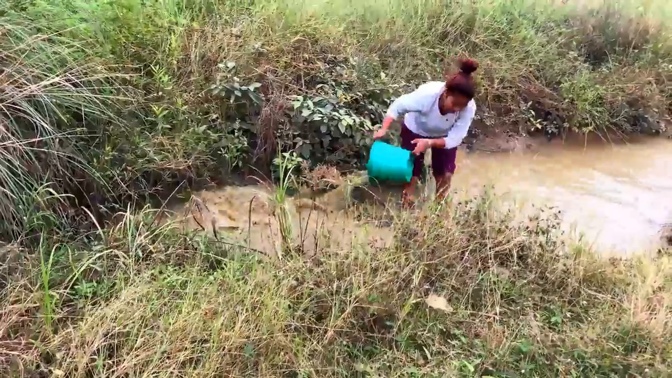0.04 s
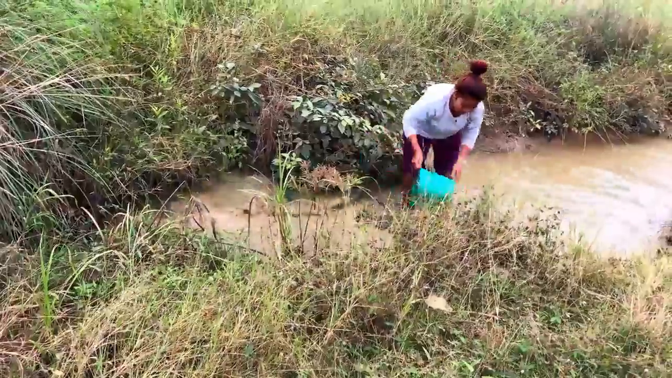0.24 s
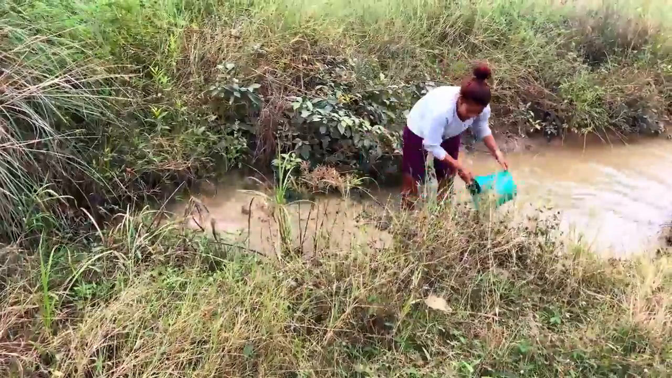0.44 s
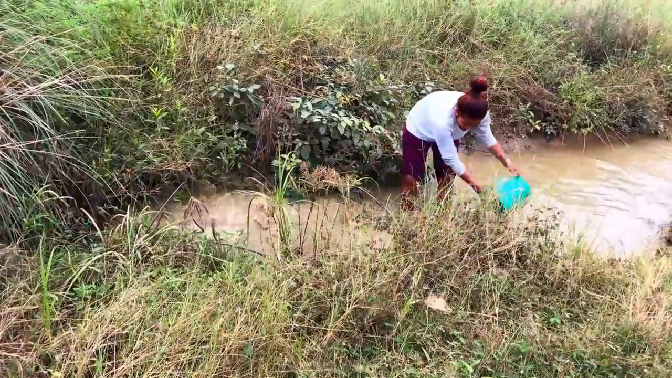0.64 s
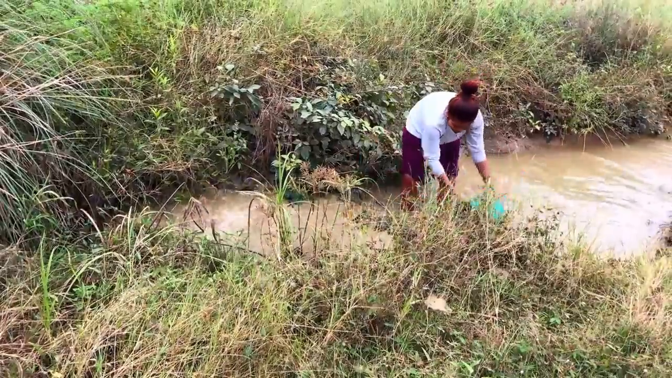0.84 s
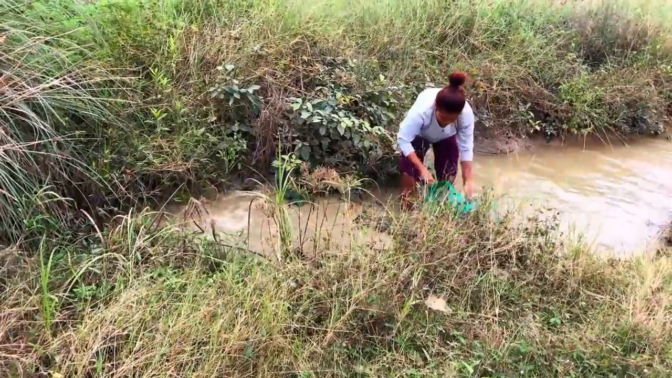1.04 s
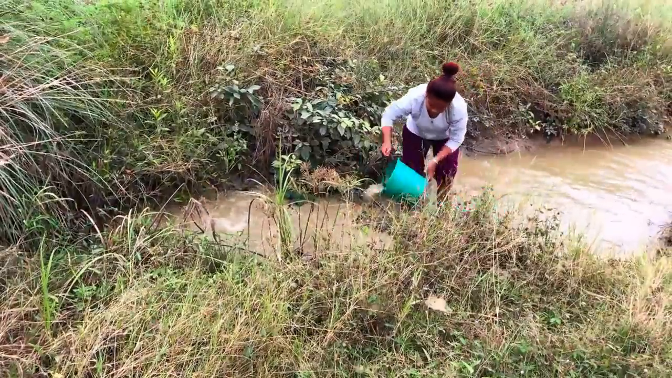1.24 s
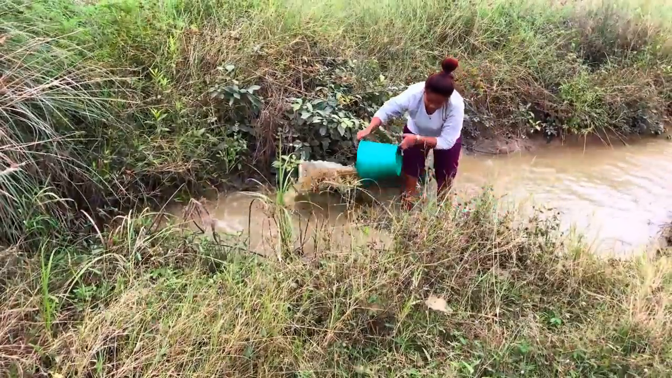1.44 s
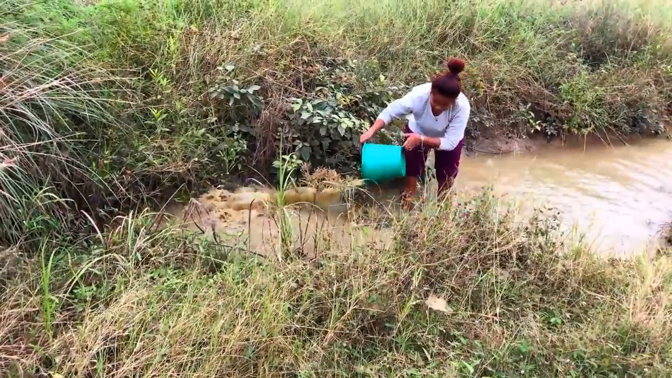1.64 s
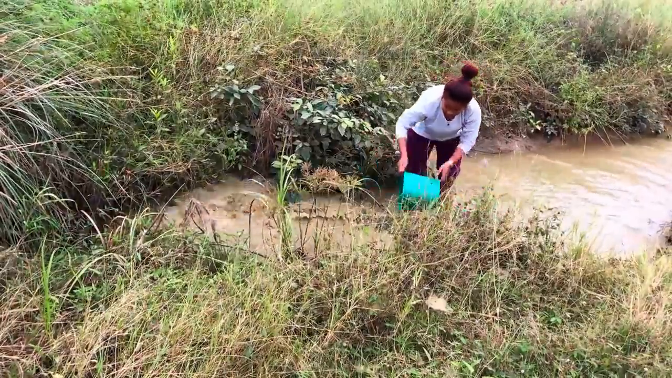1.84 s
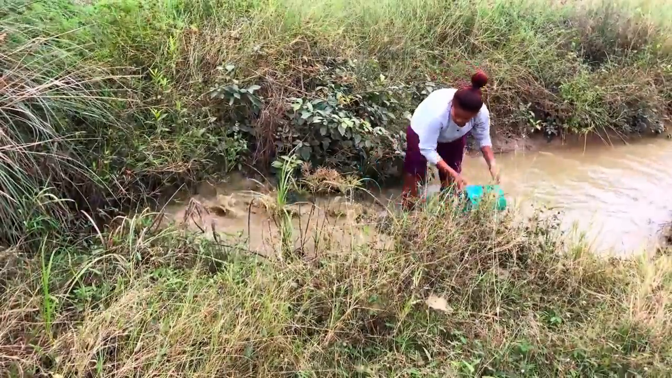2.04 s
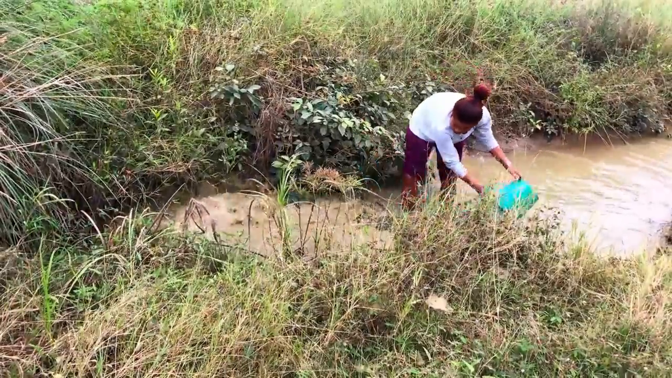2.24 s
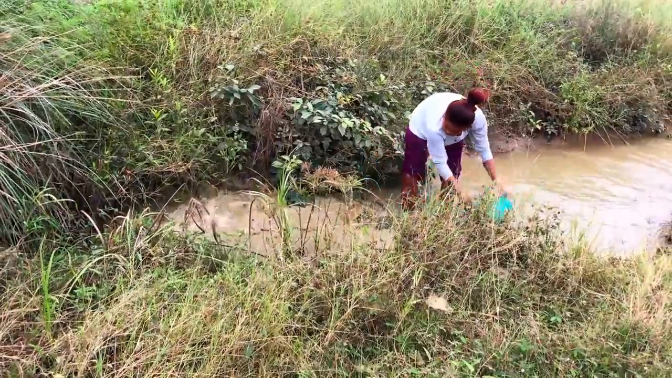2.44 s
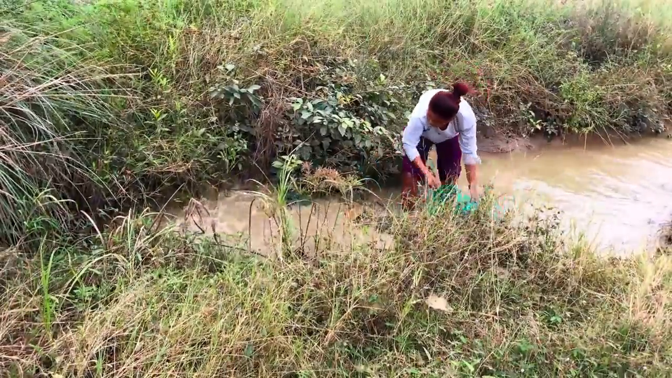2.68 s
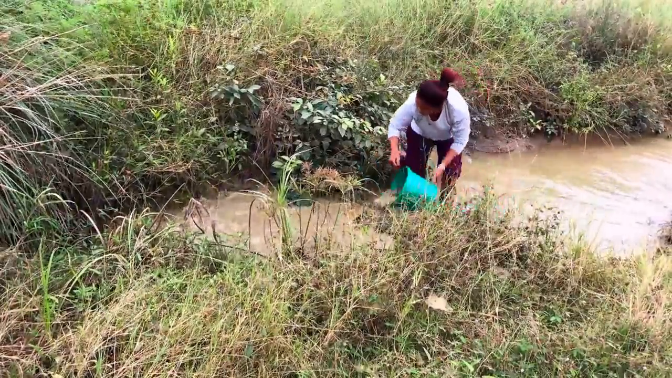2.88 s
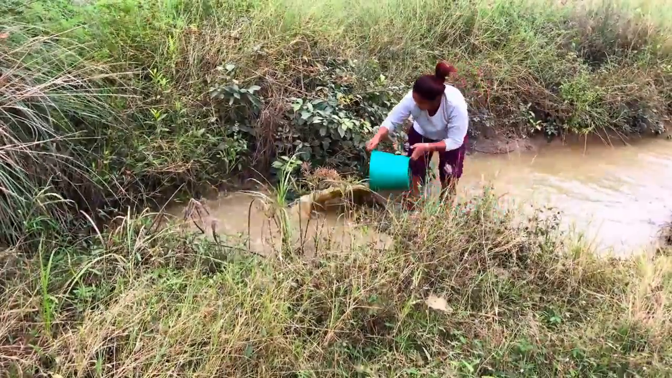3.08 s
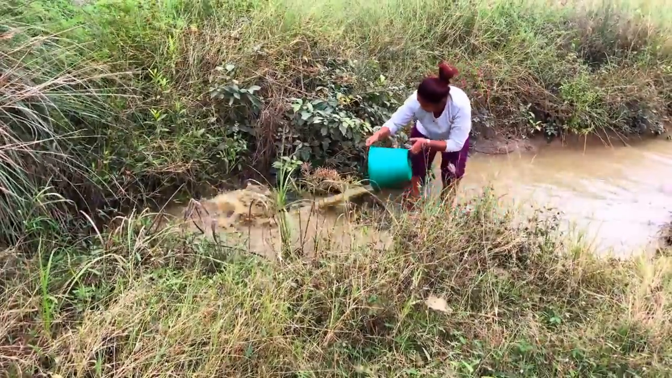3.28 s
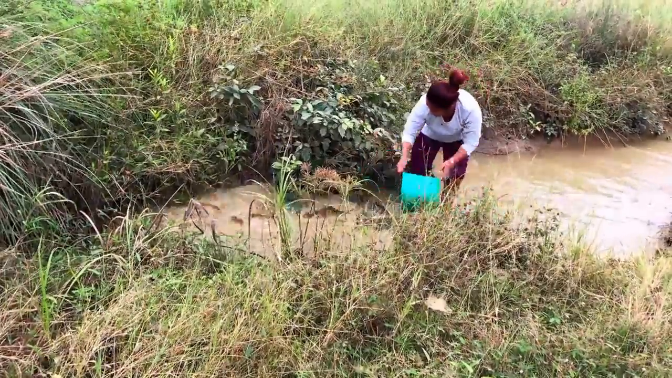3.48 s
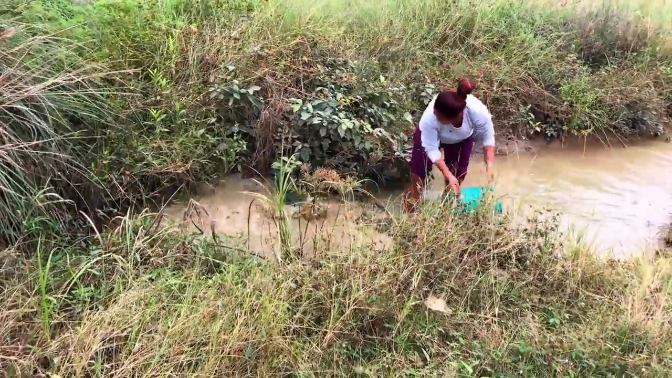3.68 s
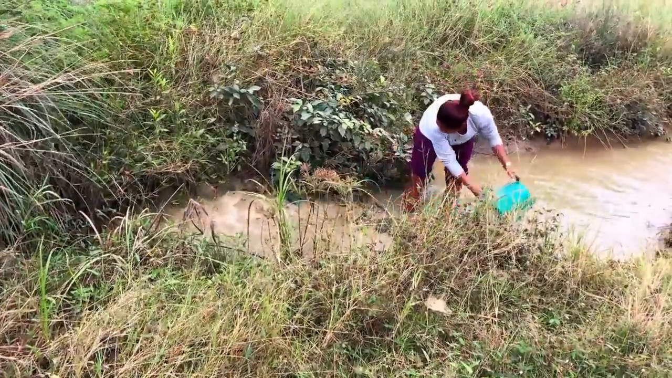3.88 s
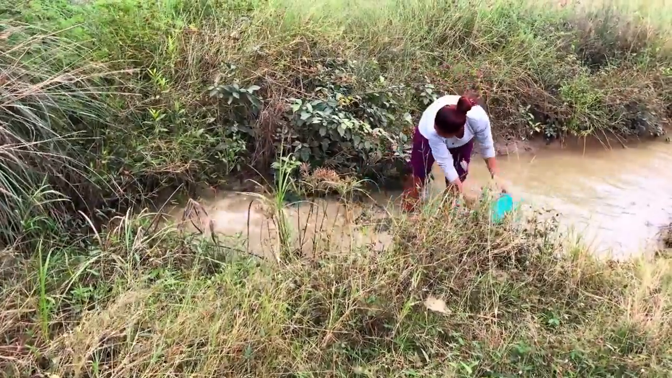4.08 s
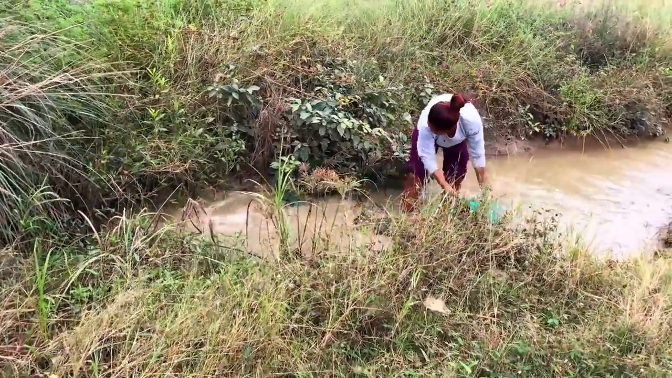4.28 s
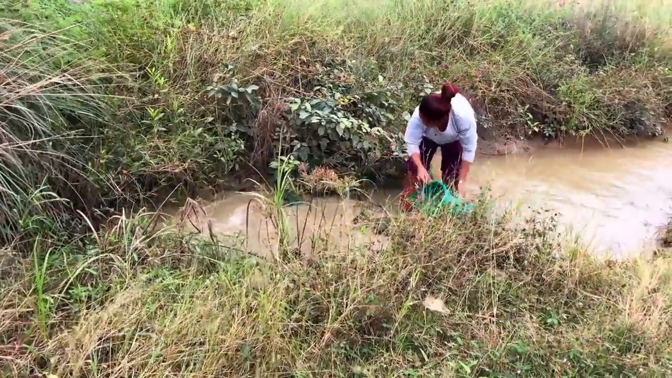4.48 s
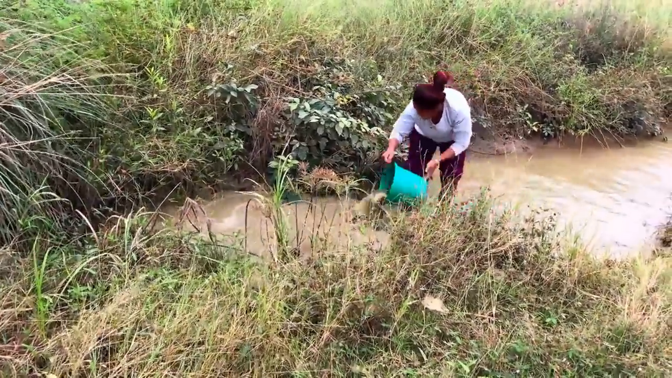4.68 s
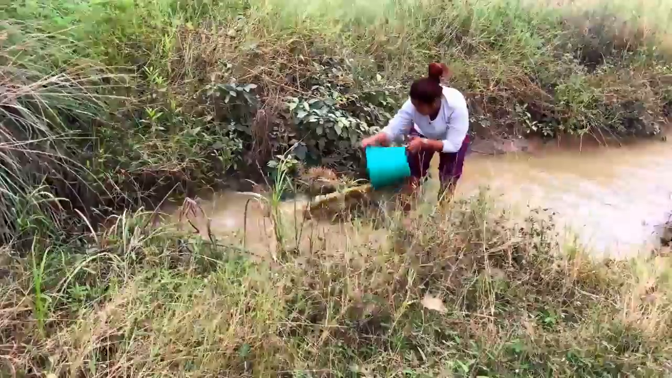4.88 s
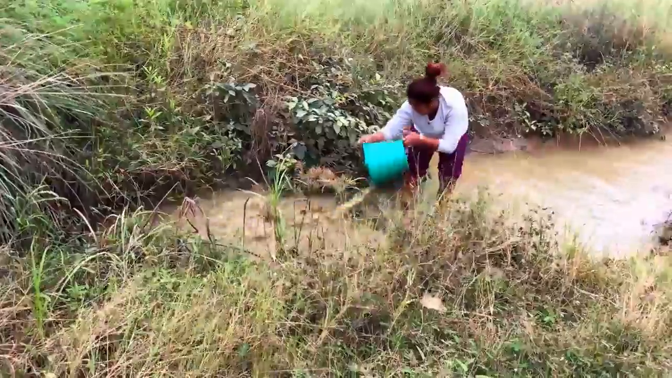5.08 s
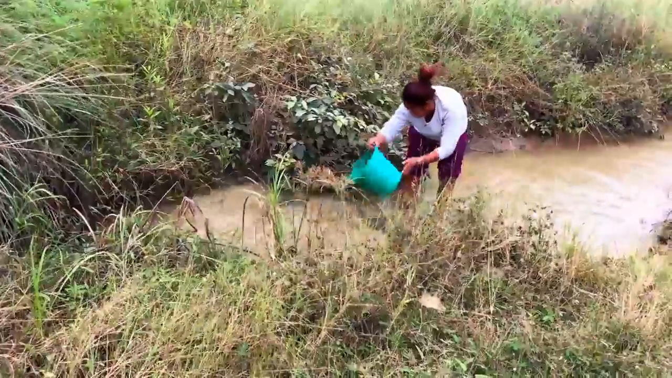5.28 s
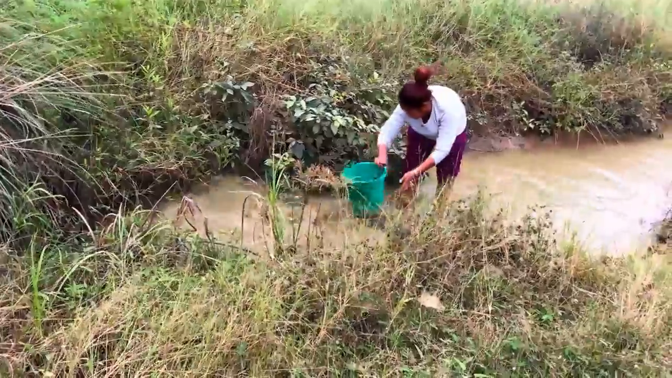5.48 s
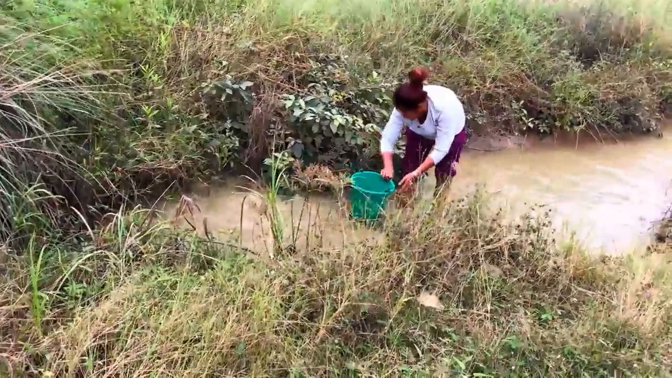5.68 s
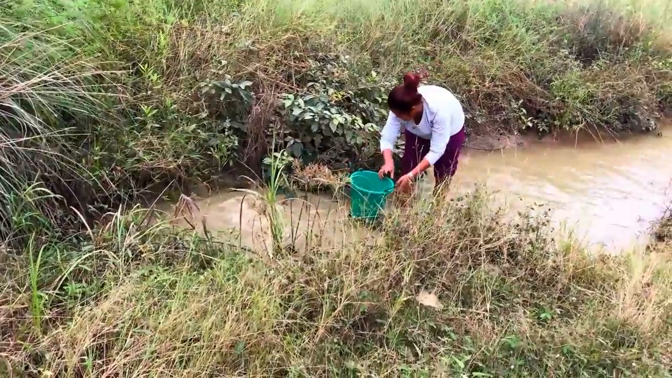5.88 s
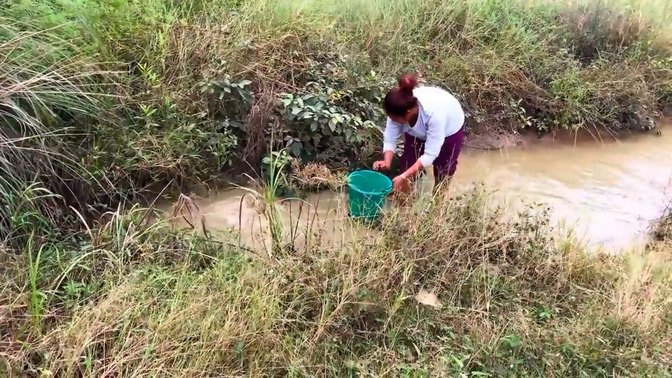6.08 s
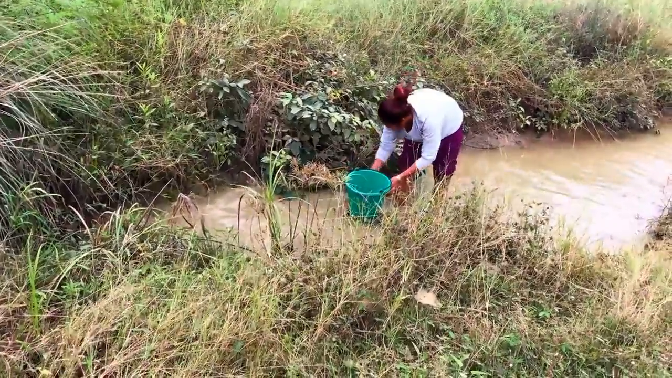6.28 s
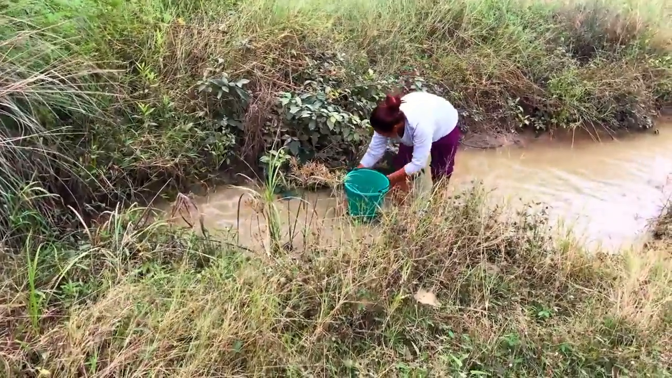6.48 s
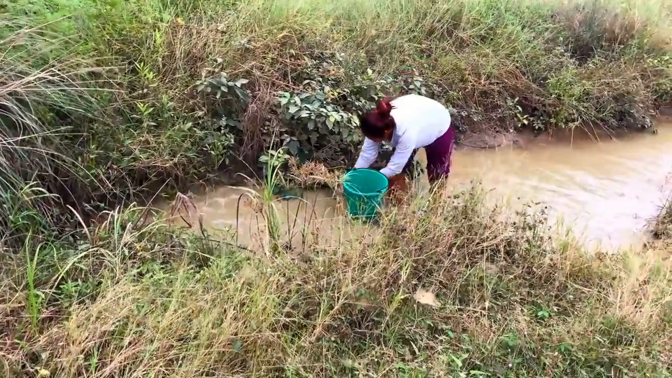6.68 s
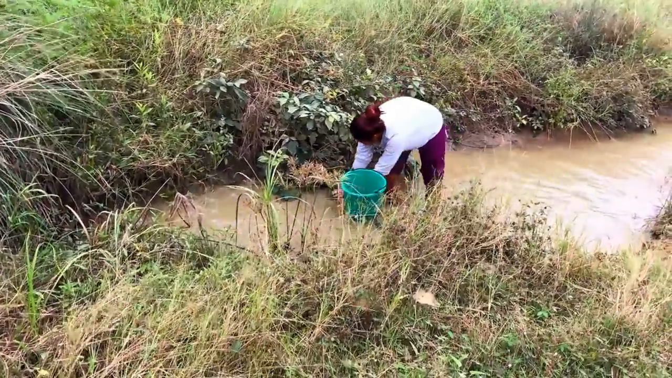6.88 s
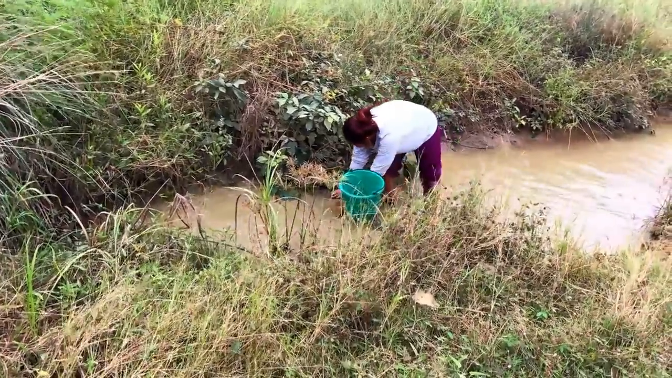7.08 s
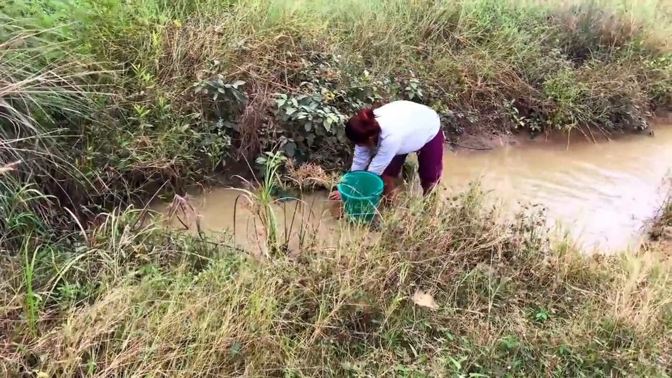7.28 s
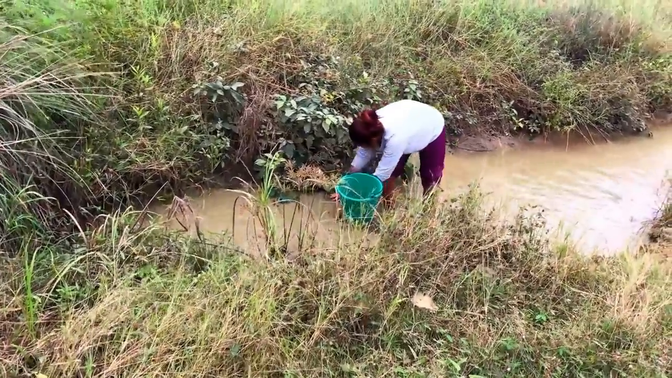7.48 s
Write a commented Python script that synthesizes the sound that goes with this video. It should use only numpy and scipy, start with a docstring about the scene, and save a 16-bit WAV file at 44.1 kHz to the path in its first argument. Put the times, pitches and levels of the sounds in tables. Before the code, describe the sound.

A bucketful of muddy water is already splashing into a ditch. Three times a plastic bucket dips with a plop, gulp and soft gurgle, then its load is flung out in a dense splash that thins to drips. Finally the bucket thumps down, its handle clacks on the rim and the water settles. Low wind buffets the microphone, a few metres away in grass.

```python
"""A bucketful is already landing in a muddy ditch, a few metres from the microphone in tall grass: random drops.
Three times the plastic bucket dips, plopping, gulping and gurgling (rising tones), drips, and is flung out again.
Noise bursts slap and tick, and bubbles froth. Then a thump sets it down and its handle clacks on the rim (modes).
The water comes to rest, and one thin insect chirp (a narrow band of noise) is heard from the grass.
Throughout, wind rumbles on the microphone (low noise, single buffets) over the faint hiss of the field."""
import sys
import numpy as np
from scipy import signal
from scipy.io import wavfile

SR = 44100
rng = np.random.default_rng(int(sys.argv[2]) if len(sys.argv) > 2 else 0)


def master_out(mix):
    """Clip the mix to full scale and print it as 16-bit PCM to the path in sys.argv[1]."""
    frames = np.transpose(np.atleast_2d(mix))
    ceiling = np.clip(frames, -1, 1)
    pcm = np.round(ceiling * 32767).astype(np.int16)
    wavfile.write(sys.argv[1], SR, pcm)


N = 332059
TIME = np.arange(N) / SR
CUTOFF_HZ = 15800

# The rim goes under, once in each scoop.
# Each row: time in seconds, relative plop level in dB, delay of the deep gulp in seconds, its relative level in dB.
DIPS = [(.99, -30.5, 0.0012, -33.5), (2.601, -37.5, 0.0028, -43), (4.326, -31, .071, -34)]
# Single buffets of wind at the microphone. Each row: start in seconds, relative level in dB, pitch in Hz.
BUFFETS = [(.628, -26.5, 180), (1.704, -23, 172), (2.062, -12, 135), (3.437, -18.5, 191), (3.574, -14, 134),
           (3.866, -22, 128), (4.968, -28, 101), (5.03, -17, 70), (5.533, -20.5, 104), (7.178, -16.5, 74),
           (7.424, -25, 143)]


def from_db(db):
    """Decibels to gain."""
    return 10 ** (np.asarray(db) / 20)


def power_sum(parts):
    """Level in dB of several sounds heard together: their powers add."""
    return 10 * np.log10(sum(from_db(np.maximum(part, -120)) ** 2 for part in parts))


def rms_one(x):
    """Scale to unit power."""
    return x / np.sqrt(np.mean(x ** 2) + 1e-20)


def band(x, low_hz, high_hz, order=2):
    """Causal band-pass."""
    high_hz = min(high_hz, .45 * SR)
    low_hz = min(low_hz, high_hz / 1.05)
    sos = signal.butter(order, [low_hz, high_hz], "band", fs=SR, output="sos")
    return signal.sosfilt(sos, x + 1e-18)


def quarter_octaves(spectrum):
    """Bands over a spectrum as (low Hz, high Hz, centre Hz, rms); their powers sum to 1."""
    edges = 20 * 2 ** (np.arange(40) / 4)
    hz = np.sqrt(edges[1:] * edges[:-1])
    inside = (hz > spectrum[0][0]) & (edges[:-1] < spectrum[-1][0])
    point_hz, point_db = np.transpose(spectrum)
    # read the density on a log-frequency axis
    density_db = np.interp(np.log(hz), np.log(point_hz), point_db)
    gain = from_db(density_db) * np.sqrt(np.diff(edges)) * inside
    return np.column_stack([edges[:-1], edges[1:], hz, gain / np.linalg.norm(gain)])[inside]


def drift(rate_hz):
    """Slow random wander with spread 1: noise through a double pole, drawn at every 40th sample."""
    pole = np.exp(-2 * np.pi * rate_hz * 40 / SR)
    noise = rng.standard_normal(N // 40 + 2002)
    slow = signal.lfilter([1], [1, -2 * pole, pole * pole], noise)[2000:]
    return np.interp(np.arange(N) / 40, np.arange(len(slow)), rms_one(slow))


def add(out, s, sound):
    """Mix a short sound in at time s."""
    start = max(int(s * SR), 0)
    out[start:start + len(sound)] += sound[:max(N - start, 0)]


def fade(t, t60):
    """Exponential decay by 60 dB in t60 seconds."""
    return np.exp(-np.log(1000) * t / max(t60, 1e-3))


def water_level():
    """Level of the moving water in dB: each throw with its spill, last slosh and wash, the stirs and the lapping."""
    # Bucketfuls flung into the ditch. Each row: landing in seconds, delay of the bulk in seconds,
    # length of the pour in seconds, relative level in dB, relative level of the last slosh in dB,
    # lead of the first spill over the rim in seconds.
    throws = [(-.018, 0.13, 0.43, -35, -36, 0.36), (1.674, 0.15, 0.41, -33.5, -39, 0.3),
              (3.277, .165, 0.47, -35, -39, 0.23), (5.017, 0.21, 0.46, -35, -47, 0.18)]
    # The bucket is dragged through the water. Each row: time in seconds, relative level in dB.
    stirs = [(1.111, -47.5), (2.415, -44.5), (2.78, -50.5), (4.03, -51), (4.329, -51.5), (4.529, -55),
             (5.8, -48)]
    # the front of the sheet lands, the bulk follows, the stream thins and breaks off
    front_db, attack_db_per_s, sag_db_per_s, release_db_per_s = -6.5, 320, 20.5, 126.5
    # levels against the throw: spill from the swinging bucket, and the ditch sloshing on
    spill_db, spill_db_per_s, wash_db, wash_db_per_s = -11.5, 74, -19, 19.5
    slosh_db_per_s = 128.5  # rise and fall as the bucket runs empty
    stir_rise_db_per_s, stir_fall_db_per_s = 99.5, 72.5
    # the ditch laps while the work goes on, then comes to rest
    lap_db, work_ends_s, settle_db_per_s, rest_db = -58.5, 6.13, 41, -72.5

    lapping = lap_db - settle_db_per_s * np.maximum(TIME - work_ends_s, 0)
    parts = [np.full(N, rest_db), lapping]
    for s, bulk_s, pour_s, db, slosh_db, spill_s in throws:
        t = TIME - s
        arrival = db + attack_db_per_s * np.minimum(t, 0)
        since_end = np.maximum(t - pour_s, 0)
        swell = np.interp(t, [0, bulk_s], [front_db, 0]) - sag_db_per_s * np.maximum(t - bulk_s, 0)
        parts.append(db + spill_db - spill_db_per_s * np.abs(t + spill_s))
        parts.append(arrival + swell - release_db_per_s * since_end)
        parts.append(slosh_db - slosh_db_per_s * np.abs(t - pour_s))
        parts.append(arrival + wash_db - wash_db_per_s * since_end)
    for s, db in stirs:
        parts.append(db - np.maximum(stir_rise_db_per_s * (s - TIME), stir_fall_db_per_s * (TIME - s)))
    return power_sum(parts)


def splashing(water_db, drops_per_s=4000, size_db=2.0, mist=0.52, clump_db=2.0, patchy_db=2.0,
              trickle_db=2.5, level_db=0.69, darken=0.11):
    """Drops hit the surface at random: a dense roar when a bucketful lands, a sparse patter as it dies away."""
    # Colour of falling water. Each row: frequency in Hz, relative density in dB per Hz.
    splash_colour = [(150, -9), (280, -2.5), (420, -7), (620, -0.5), (860, -0.5), (1050, -4), (1350, 0.5),
                     (1800, -7), (2350, -7), (3400, -6), (5000, -12.5), (7000, -13), (12500, -15.5),
                     (16000, -18.5)]
    flow_db = water_db + 38  # 0 dB flow brings drops_per_s
    rate = drops_per_s * from_db(flow_db)
    sizes = from_db(size_db * np.minimum(rng.exponential(1, N), 4)) * rng.choice([-1, 1], N)
    hits = rng.random(N) < rate / SR
    # keep the average power steady whatever the rate; the flow level is applied below
    drops = rms_one(sizes * hits / np.sqrt(rate))
    # a trickle is more uneven in pitch and time than a full splash
    uneven_db = patchy_db + trickle_db * np.clip(-flow_db / 10, 0, 1)
    clumps = drift(15.5)
    out = 0
    for low, high, hz, gain in quarter_octaves(splash_colour):
        # each drop sounds in about half of the bands, over a mist too fine to resolve
        grains = drops * (rng.random(N) < .5) + mist * rng.standard_normal(N)
        # heavy water is darker; fine spray is steadier and lingers when the flow drops
        band_db = water_db + level_db - darken * flow_db * np.log2(hz / 2000)
        fine = np.clip(np.log(hz / 2500) / np.log(8000 / 2500), 0, 1)
        band_db = band_db + clump_db * clumps + uneven_db * (1 - fine / 2) * drift(44)
        out = out + gain * rms_one(band(grains, low, high)) * from_db(band_db)
    return out


def bubble(hz, t60, rise, swell_s):
    """A pocket of air rings and glides by rise octaves per second, upward as it nears the surface."""
    t = TIME[:int(max(t60, .005) * SR)]
    pitch = np.minimum(hz * 2 ** (rise * t), CUTOFF_HZ)
    tone = np.sin(2 * np.pi * np.cumsum(pitch) / SR)
    return tone * fade(t, t60) * (1 - np.exp(-t / swell_s))


def free_rise(hz):
    """Glide in octaves per second: 16 at 600 Hz; smaller, higher bubbles float up more slowly and glide less."""
    return 16 * 600 / hz


def froth(water_db, count=1300, mean_rise=7.9):
    """Stirred water is full of bubbles that rise in pitch; the small ones are higher, shorter and fainter."""
    level_db, follow, spread_db, small_db, cycles = -38, .72, 2.6, -4.5, 20
    out = np.zeros(N)
    for (when, size, lift), luck in zip(rng.random((count, 3)), rng.standard_normal(count)):
        hz = 560 * 6 ** size  # size runs from large (0) to small (1)
        at = int(when * N)
        still_db = min(water_db[at] + 55, 0)  # bubbles fade out in still water
        flow_db = follow * (water_db[at] + 38)
        gain = from_db(level_db + flow_db + still_db + small_db * size + spread_db * min(luck, 1.8))
        add(out, at / SR, gain * bubble(hz, cycles / hz, 2 * mean_rise * lift, swell_s=0.0018))
    return out


def spatter(water_db, count=420, width=1.22):
    """Stray drops tick on the surface and the grass, and stand out between the throws."""
    level_db, follow, spread_db, t60 = -38, .5, 3.5, .006
    out = np.zeros(N)
    t = TIME[:SR // 50]
    for (when, size), luck in zip(rng.random((count, 2)), rng.standard_normal(count)):
        hz = 2800 * 5.1 ** size
        at = int(when * N)
        # fewer and fewer drops are heard as the water comes to rest
        still_db = min(water_db[at] + 56, 0)
        flow_db = follow * (water_db[at] + 38)
        gain = from_db(level_db + flow_db + still_db + spread_db * min(luck, 2))
        tick = rms_one(band(rng.standard_normal(len(t)), hz / width, hz * width, order=1))
        add(out, at / SR, gain * tick * fade(t, t60))
    return out


def gurgle(per_dip=12, centre_s=0.075, spread_s=.3, level_db=-49.5, vary_db=5.5):
    """Air leaves the filling bucket as soft rising bubbles at random moments around each dip."""
    low_hz, high_hz, cycles = 393, 1394, 29
    out = np.zeros(N)
    for s, *_ in DIPS:
        for when, size, luck in rng.uniform(-1, 1, (per_dip, 3)):
            hz = low_hz * (high_hz / low_hz) ** ((size + 1) / 2)
            tone = bubble(hz, cycles / hz, free_rise(hz), swell_s=.003)
            add(out, s + centre_s + spread_s * when, from_db(level_db + vary_db * luck) * tone)
    return out


def air_pockets():
    """Every large bubble as (s, relative dB, Hz, t60 s, octaves per s): plop and deep gulp per dip, then single ones."""
    # Single bubbles and drips. Each row: start in seconds, relative level in dB, pitch in Hz, t60 in seconds.
    single_bubbles = [(1.054, -29, 1230, 0.015), (1.107, -37, 1370, .037), (1.236, -38.5, 735, 0.047),
                      (2.484, -46, 548, 0.34), (2.738, -32, 2970, 0.0091), (3.928, -37, 455, 0.064),
                      (4.127, -45, 511, 0.23), (4.475, -42, 502, 0.073), (4.518, -41.5, 715, 0.16),
                      (4.576, -41, 3330, 0.053), (4.738, -41, 2230, 0.065), (4.897, -40.5, 2660, 0.066)]
    # the two air pockets of a dip: Hz, t60 in seconds, glide in octaves per second (the gulp sinks)
    plop, deep_gulp = (930, 0.041, 5.7), (277, 0.18, -2.0)
    plops = [(s, db, *plop) for s, db, _, _ in DIPS]
    deep = [(s + later_s, db, *deep_gulp) for s, _, later_s, db in DIPS]
    single = [(s, db, hz, t60, free_rise(hz)) for s, db, hz, t60 in single_bubbles]
    return plops + deep + single


def gulps(level_db=2.0, swell_s=0.00032):
    """The rim goes under and lets air escape in single large bubbles; drips ring higher."""
    out = np.zeros(N)
    for s, db, hz, t60, rise in air_pockets():
        tone = bubble(hz, t60, rise, swell_s)
        # a bubble changes shape every dozen cycles or so, and its tone wobbles
        wobble = from_db(2.6 * drift(hz / 12)[:len(tone)])
        add(out, s, from_db(db + level_db) * tone * wobble)
    return out


def slaps(spread=1.39, grain_db=3.0, swell_share=0.021, level_db=-2.0):
    """A sheet of water or the dipping rim smacks the surface: a short grainy burst of noise."""
    # Slaps of water on the bucket and the surface.
    # Each row: start in seconds, relative level in dB, centre in Hz, t60 in seconds.
    water_slaps = [(.146, -33, 8000, 0.13), (.319, -27, 1170, 0.043), (.932, -36.5, 3700, 0.034),
                   (1.039, -33.5, 893, 0.072), (1.11, -31.5, 4800, 0.066), (2.417, -29.5, 1980, .044),
                   (2.735, -32, 2760, 0.046), (3.122, -37, 2760, 0.063), (3.436, -23, 1940, 0.042),
                   (4.018, -34, 9500, 0.0075), (4.321, -34, 10000, 0.021), (4.461, -42, 2500, .05),
                   (5.001, -30.5, 4120, 0.047), (5.203, -29.5, 1440, .034), (5.715, -41.5, 900, 0.29),
                   (5.781, -31, 1760, 0.1), (5.882, -37, 8000, 0.023), (6.08, -42, 5600, 0.034),
                   (6.127, -41, 3800, 0.021)]
    # the rim smacks at every dip, 0.49 dB over the listed plop level, at 850 Hz with a t60 of 0.051 s
    rim_slaps = [(s, db + 0.49, 850, 0.051) for s, db, _, _ in DIPS]
    out = np.zeros(N)
    t = TIME[:SR // 4]
    for s, db, hz, t60 in water_slaps + rim_slaps:
        grains = rng.standard_normal(len(t)) * from_db(grain_db * rng.standard_normal(len(t)))
        narrow = band(grains, hz / spread, hz * spread, order=1)
        burst = rms_one(band(narrow, 280, 3 * hz))
        swell = 1 - np.exp(-t / (swell_share * t60))
        add(out, s, from_db(db + level_db) * burst * fade(t, t60) * swell)
    return out


def bucket(crack_db=-9.5, crack_t60=0.026, vary_db=1.5, bounce=0.23, bounce_s=0.00326):
    """Every blow rings the same modes; the contact decides which part of them is heard."""
    # Blows on the bucket; soft ones on the base are deep, hard ones on the rim are thin.
    # Each row: start in seconds, relative level in dB, lowest Hz, highest Hz.
    knocks = [(5.713, -24, 60.4, 260), (5.721, -9, 50, 129), (5.739, -9.5, 60, 142), (5.753, -8.5, 50, 120),
              (5.783, -8.5, 245, 450), (5.897, -26.5, 726, 3500), (5.951, -36.5, 150, 400),
              (5.987, -19.5, 900, 12900), (6.019, -30, 1790, 4000), (6.203, -33, 1030, 8100)]
    # Its air cavity and walls. Each row: mode in Hz, relative level in dB, t60 in seconds.
    modes = [(92.5, -3.5, 0.038), (166, -1, 0.047), (319, 1.5, 0.041), (496, -11.5, .066),
             (606, -12, 0.056), (715, -5, 0.023), (922, -15, .054), (1290, -2, 0.02), (1473, -6, 0.032),
             (1860, -9.5, 0.019), (2100, -17, 0.04), (2780, -9, 0.011), (3460, -20, 0.037),
             (5730, -14, 0.01), (7000, -11, .02), (8000, -15, .015)]
    out = np.zeros(N)
    t = TIME[:SR // 4]
    for s, db, low_hz, high_hz in knocks:
        ring = np.zeros(len(t))
        for k, (hz, mode_db, t60) in enumerate(modes):
            strength = (-1) ** k * from_db(mode_db + vary_db * rng.standard_normal())
            ring += strength * np.sin(2 * np.pi * hz * t) * fade(t, t60)
        crack = from_db(crack_db) * rng.standard_normal(len(t)) * fade(t, crack_t60)
        blow = from_db(db) * band(ring + crack, low_hz, high_hz, order=1)
        add(out, s, blow)
        # springy plastic touches a second time, more softly
        add(out, s + bounce_s, bounce * band(blow, 30, 2500, order=1))
    return out


def banks(x, echo_db=-21.5, t60=0.1, top_hz=4500):
    """Earth banks and grass scatter a short, dull tail."""
    t = TIME[:SR // 3]
    noise = band(rng.standard_normal(len(t)), 440, top_hz, order=1)
    scatter = noise * fade(t, t60) * (t > .006)  # nothing returns in the first 6 ms
    return x + from_db(echo_db) * signal.fftconvolve(x, scatter / np.linalg.norm(scatter))[:N]


def wind_level(gust_db=-17.5, gust_db_per_s=107):
    """Level of the rumble in dB before its flutter: the slow breeze and a short gust around each buffet."""
    # Breeze on the microphone. Each row: time in seconds, rumble level in dB.
    breeze = [(0.0, -31), (0.39, -45.5), (0.51, -41.5), (0.96, -52.5), (1.08, -42), (1.23, -51),
              (1.71, -38), (1.8, -47), (1.98, -35), (2.49, -42.5), (2.73, -30), (3.12, -42), (3.84, -36),
              (4.38, -41), (5.64, -34), (6.57, -49.5), (6.69, -44.5), (7.53, -39.5)]
    breeze_db = np.interp(TIME, *np.transpose(breeze))
    gusts = [db + gust_db - gust_db_per_s * np.abs(TIME - s) for s, db, _ in BUFFETS]
    return power_sum([breeze_db] + gusts)


def wind(flutter_db=2.5, lump_db=5.5, brighten=0.15, buffet_cycles=3.9, buffet_db=4.0):
    """Eddies at the microphone port: stronger gusts reach higher, and some arrive as single buffets."""
    # Colour of the wind. Each row: frequency in Hz, relative density in dB per Hz.
    rumble_colour = [(22, -33), (35, -6.5), (52, 5), (75, 3), (110, -3.5), (160, -14), (250, -22.5),
                     (400, -33.5), (600, -50)]
    rumble_db = wind_level() + flutter_db * np.tanh(drift(14.0))
    lumps = np.tanh(drift(7.0))
    out = 0
    for low, high, hz, gain in quarter_octaves(rumble_colour):
        octaves_up = np.clip(np.log2(hz / 70), 0, 2)
        tilt_db = brighten * (rumble_db - rumble_db.mean()) + lump_db * lumps
        band_db = rumble_db + octaves_up * tilt_db
        out = out + gain * rms_one(band(rng.standard_normal(N), low, high)) * from_db(band_db)
    t = TIME[:SR // 8]
    for s, db, hz in BUFFETS:
        shape = fade(t, buffet_cycles / hz) * (1 - np.exp(-t / 0.0026))
        add(out, s, from_db(db + buffet_db) * np.sin(2 * np.pi * hz * t) * shape)
    return out


def field(level_db=-65.5):
    """Faint even hiss of grass and air: steady noise in quarter-octave bands."""
    # Colour of the still field. Each row: frequency in Hz, relative density in dB per Hz.
    field_colour = [(180, -28), (300, -17), (484, 1.5), (696, 1), (6570, -10), (10300, -7), (12900, -6),
                    (15500, -9)]
    hiss = np.zeros(N)
    for low, high, _, gain in quarter_octaves(field_colour):
        hiss += gain * rms_one(band(rng.standard_normal(N), low, high))
    return from_db(level_db) * hiss


def insect(s=6.775, length_s=.022, hz=12950, width_hz=160, level_db=-64.0):
    """One thin, very high chirp from the grass: narrow noise under a bell-shaped swell."""
    rasp = rms_one(band(rng.standard_normal(N), hz - width_hz / 2, hz + width_hz / 2))
    return from_db(level_db) * rasp * np.exp(-.5 * ((TIME - s) / length_s) ** 2)


def scene():
    """Water and bucket in the ditch, wind, hiss and an insect around the microphone."""
    water_db = water_level()
    water = splashing(water_db) + froth(water_db) + spatter(water_db) + gurgle() + gulps() + slaps()
    ditch = banks(water + bucket())
    return (ditch + wind() + field() + insect())[None]


def record(dry):
    """The microphone port notches the treble and the top is cut."""
    # Notches of the microphone port. Each row: centre in Hz, width in Hz, depth in dB.
    port_dips = [(4920, 230, -4.5), (7620, 240, -7), (10450, 610, -6)]
    for hz, width_hz, depth_db in port_dips:
        peak = signal.lfilter(*signal.iirpeak(hz, hz / width_hz, fs=SR), dry)
        dry = dry - (1 - from_db(depth_db)) * peak
    return signal.sosfilt(signal.ellip(10, .1, 70, CUTOFF_HZ, fs=SR, output="sos"), dry)


dry = scene()
out = record(dry)
master_out(out)
```